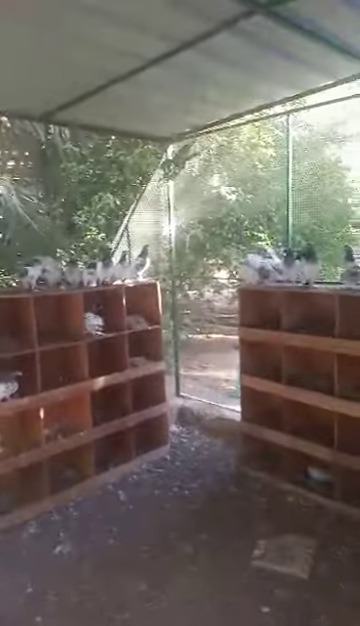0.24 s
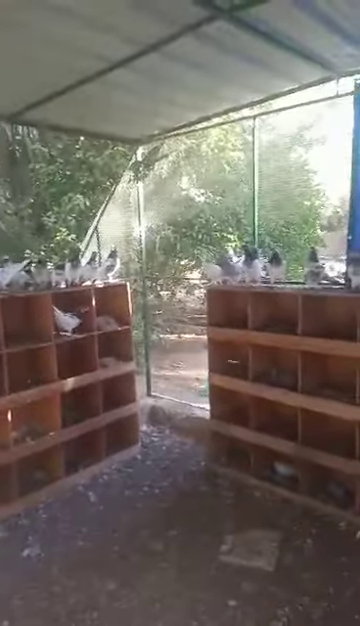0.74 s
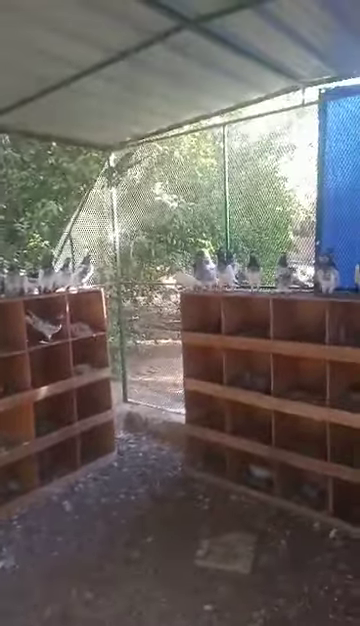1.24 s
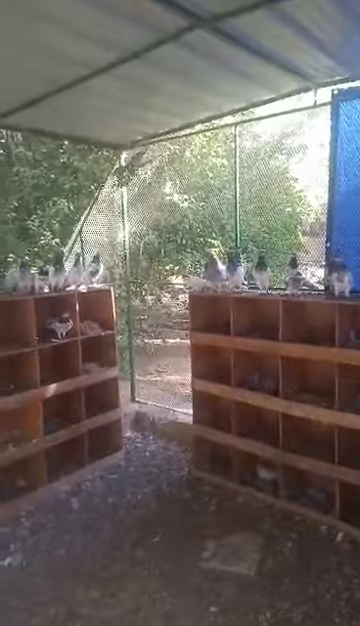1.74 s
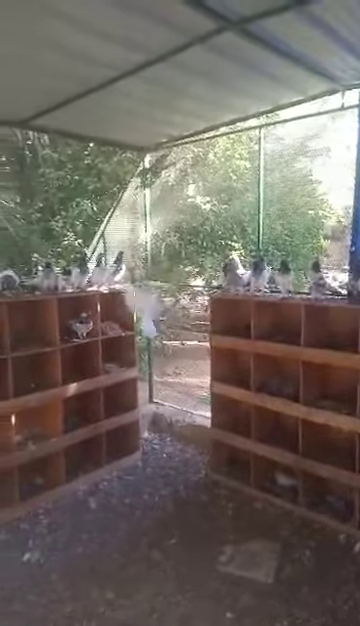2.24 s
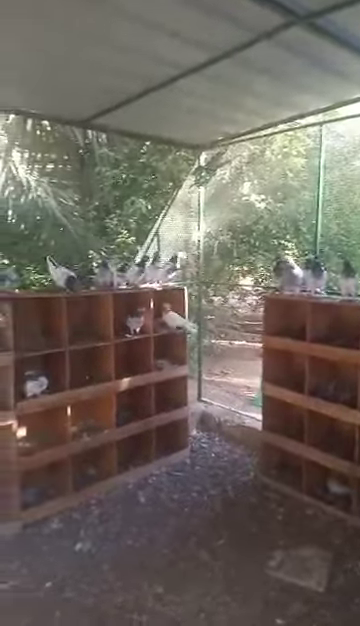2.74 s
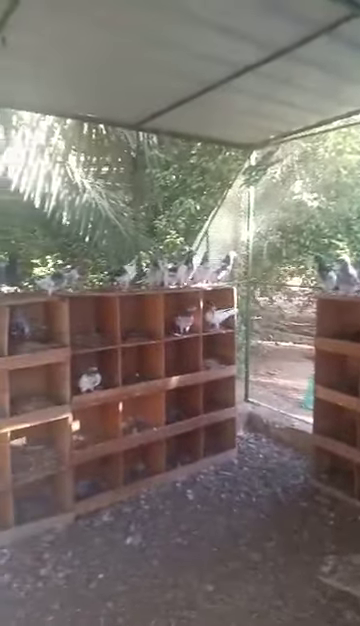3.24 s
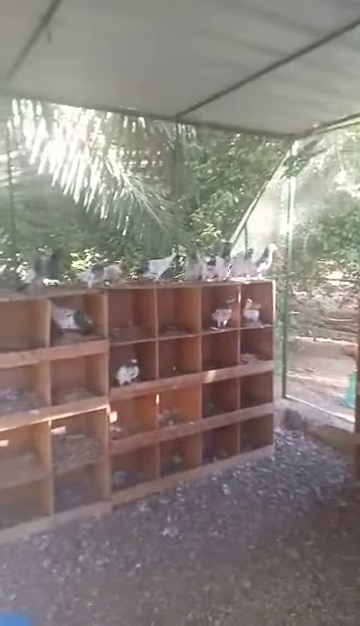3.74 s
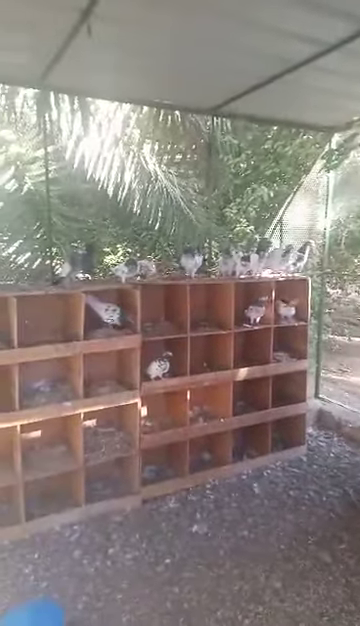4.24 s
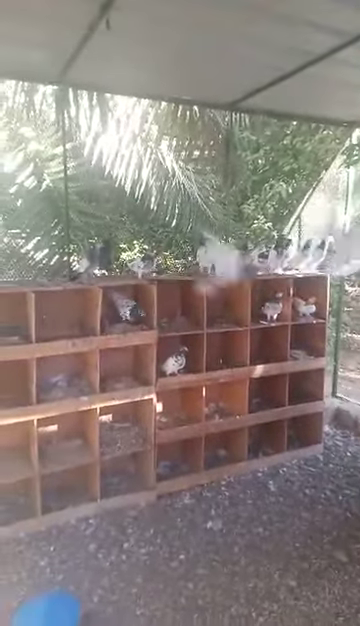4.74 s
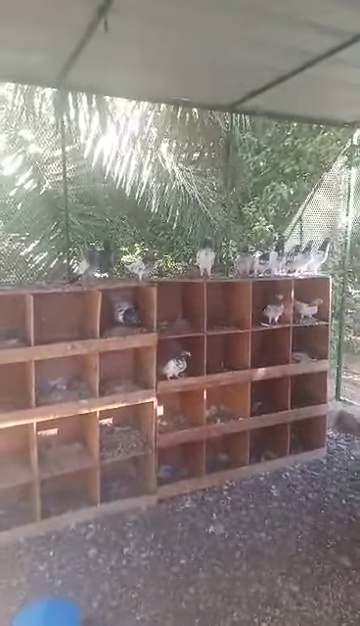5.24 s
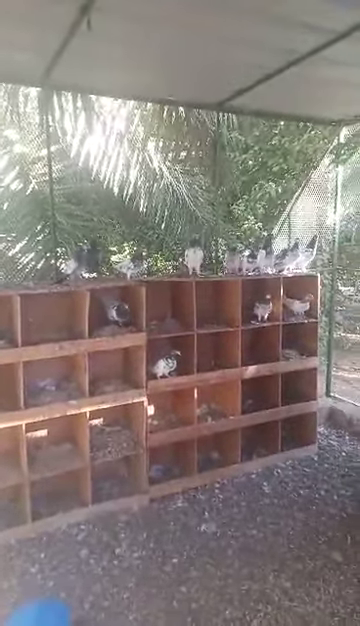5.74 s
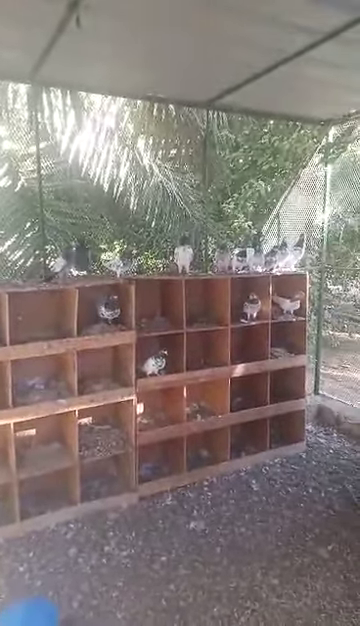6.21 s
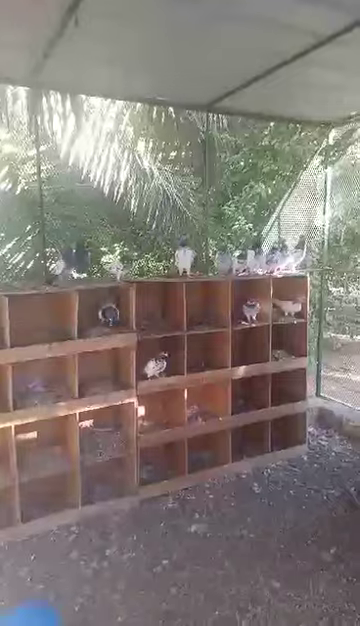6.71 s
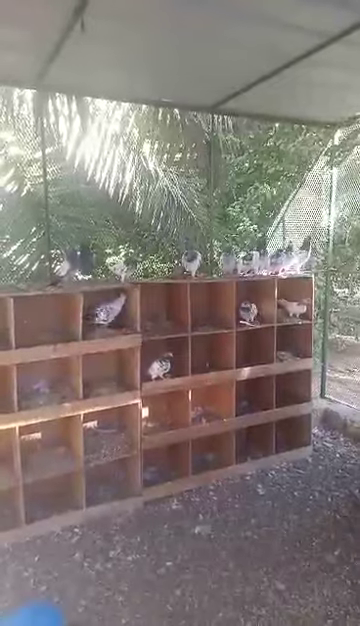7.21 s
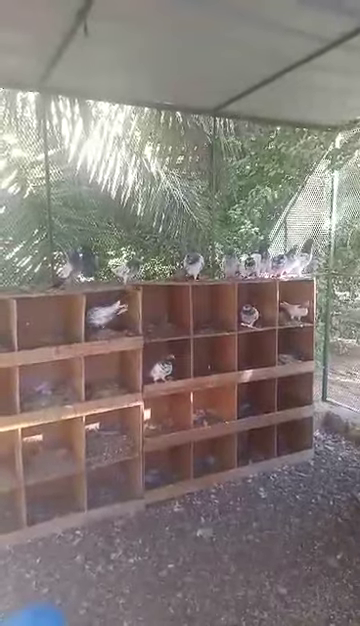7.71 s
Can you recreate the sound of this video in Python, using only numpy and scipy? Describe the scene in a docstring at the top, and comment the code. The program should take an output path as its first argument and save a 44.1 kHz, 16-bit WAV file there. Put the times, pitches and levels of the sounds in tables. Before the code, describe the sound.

In a roofed wire loft with wooden nest boxes, pigeons coo in short, low, gliding notes that swell, break and growl, among quick throaty pulses. A blurred flock murmurs behind. Wings clap and flutter past around two seconds and again near five. Squabs peep in thin falling whistles, wild birds screech raspily, and faint chirping and soft outdoor air continue. A phone microphone catches it with a short, boxy echo.

```python
"""Pigeons cooing in a wire loft

Pigeons coo in a roofed wire loft: gliding throat tones swell, break and dive, among short low pulses and held
tones, a few perhaps wing thuds; blurred, fluttering tones make the flock further back. Squabs peep in falling
whistles and wild birds squawk in raspy harmonic syllables, over faint sliding chirps and soft air noise.
Noise bursts clap as wings, swish as pigeons fly past and tick as claws. Boxes and roof give a short echo.
"""
import sys
import numpy as np
from scipy import signal
from scipy.fft import rfft, irfft, next_fast_len
from scipy.io import wavfile
from scipy.ndimage import uniform_filter1d, map_coordinates

SR = 44100
rng = np.random.default_rng(int(sys.argv[2]) if len(sys.argv) > 2 else 0)


def int16_out(signal):
    """Quantize to a 16-bit WAV file."""
    q = np.round(np.clip(np.atleast_2d(signal).T, -1, 1) * 32767)
    wavfile.write(sys.argv[1], SR, q.astype(np.int16))


N = 351477
TOP_HZ = 15500  # band limit

# Breathy growl of the pigeon's throat: (frequency [Hz], density [dB])
GROWL_SPECTRUM = [(80, -26.5), (180, -2.5), (400, 5.5), (560, -2.5), (800, -23.5), (1500, -43.5),
                  (5000, -110)]


def amp(db):
    """Decibels to gain."""
    return 10 ** (np.asarray(db) / 20)


def unit(x):
    """Scale to rms 1."""
    return x / np.sqrt(np.mean(x ** 2) + 1e-20)


def along(points, hz):
    """Read (Hz, value) points on a log frequency axis."""
    f, v = np.transpose(points)
    return np.interp(np.log(hz + 1), np.log(f + 1), v)


def curve(rows):
    """One value per sample from (s, value) rows."""
    return np.interp(np.arange(N) / SR, *np.transpose(rows))


def wobble(rate, size):
    """A smooth random curve through `rate` random knots a second."""
    knots = rng.standard_normal(int(size * rate / SR) + 4)
    return map_coordinates(knots, [np.arange(size) * rate / SR + 1])


def noise(spectrum, size):
    """Coloured noise of rms 1."""
    m = next_fast_len(size)
    white = rfft(rng.standard_normal(m))
    return unit(irfft(white * amp(along(spectrum, np.fft.rfftfreq(m, 1 / SR))), m)[:size])


def turns(hz):
    """Phase of an oscillator that follows a pitch curve."""
    return 2 * np.pi * np.cumsum(hz) / SR


def add(track, s, sound):
    """Mix a sound into a track at time s, or at the start if s is negative."""
    part = track[max(round(s * SR), 0):][:len(sound)]
    part += sound[:len(part)]


def throat(phase, second_db=-42, third_db=-49):
    """The swollen crop radiates little but the fundamental."""
    overtones = amp(second_db) * np.sin(2 * phase) + amp(third_db) * np.sin(3 * phase)
    return np.sqrt(2) * (np.sin(phase) + overtones)


def coo_voice(hz, db, roll, roll_hz=55, roll_db=5, bend=.1, waver=0.0056, growl_db=-8, tremor_db=2.0):
    """A gliding tone; where it rolls, an uneven flutter shakes loudness and pitch and breaks into a growl."""
    size = len(hz)
    flutter = np.sin(turns(roll_hz * (1 + 0.53 * wobble(40, size))))
    hz = hz * (1 + waver * wobble(60, size) + bend * roll * (flutter + wobble(220, size)))
    voice = throat(turns(hz)) + amp(growl_db) * roll ** 2 * noise(GROWL_SPECTRUM, size)
    level_db = db + tremor_db * wobble(79.3, size) + roll * (roll_db * flutter - 8.0)
    return amp(level_db) * voice


def coos(edge_s=0.0067, break_s=0.0045):
    """A coo settles onto its pitch as it swells; after a last, clear push the voice breaks, dives and growls out."""
    # Coos: (break [s], swell [s], start pitch [Hz], held pitch [Hz], settling time [s],
    #        relative level [dB], fullness [above 1 swells early], roll [0-1])
    coo_rows = [(.055, 0.064, 472, 349, 0.026, -29.5, 7.6, 1), (1.2, 0.053, 537, 482.5, 0.032, -21, 3, 0.2),
                (1.819, 0.055, 567, 492, 0.027, -28, 1.9, 0),
                (2.242, 0.037, 547, 396, 0.014, -22, 3.1, 0.4),
                (2.899, 0.054, 596, 447.5, 0.02, -24.5, 2.8, 0.42),
                (3.368, 0.18, 753.4, 489.5, 0.044, -17.5, 0.49, 0.3),
                (4.046, .135, 726, 441, .026, -23, 2.8, 0.14),
                (4.581, .14, 656, 487.4, 0.07, -16.5, 0.52, 0.45),
                (5.765, 0.14, 623, 464, 0.027, -20.5, 2.2, 0.05),
                (7.704, 0.16, 554, 417, 0.048, -19.5, 2.1, 0.15)]
    swell_db, push_db, push_s = 28, 2, 0.011  # rise of a coo; last push before the break and its width
    dive, dive_s, dive_lag_s = .39, 0.0087, .008  # share of the pitch lost at the break, how fast, how late
    fade_db_per_s, tail_s, tail_roll = 338.5, .06, 0.8  # the growl after the break
    out = np.zeros(N)
    for s, swell_s, start_hz, held_hz, settle_s, db, fullness, roll in coo_rows:
        t = np.arange(-swell_s, tail_s, 1 / SR)  # the voice breaks at t = 0
        push = np.exp(-(t / push_s + .5) ** 2)
        settled = held_hz + (start_hz - held_hz) * np.exp(-(t + swell_s) / settle_s)
        hz = settled * (1 - dive / (1 + np.exp((dive_lag_s - t) / dive_s)))
        effort = db - swell_db * np.maximum(-t / swell_s, 0) ** fullness
        effort = effort + push_db * push - fade_db_per_s * np.maximum(t, 0)
        rolling = np.interp(t, [0, break_s], [roll, tail_roll]) * (1 - push)
        edges = np.clip(np.minimum(t + swell_s, tail_s - t) / edge_s, 0, 1)
        add(out, s - swell_s, edges * coo_voice(hz, effort, rolling))
    return out


def wings(beat_hz=15, beat_db=6, uneven_db=2.0, crackle_db=2.5, gain_db=-1):
    """Feathers snap and swish with every stroke, finely crackling, loudest where the bird is nearest."""
    # Flights past the listener: (start [s], nearest [s], end [s], relative level [dB])
    flights = [(0, 0.03, 0.17, -48.5), (.7, 2.098, 2.35, -39), (4.621, 4.993, 5.55, -36)]
    # Swish of the feathers: (frequency [Hz], density [dB])
    feathers = [(30, -21.5), (70, 14.5), (130, 4), (300, 14), (780, 7), (1400, 3.5), (2500, 2),
                (4200, -8.5), (5300, -29), (8000, -34.5), (10000, -48), (15500, -37)]
    pass_s = 0.14  # distance of the nearest approach over the speed of flight
    out = np.zeros(N)
    for start, nearest, end, db in flights:
        t = np.arange(start, end, 1 / SR)
        beat = turns(beat_hz * (1 + 0.21 * wobble(8, len(t))))
        stroke = signal.sawtooth(beat, .1)  # quick rise, slow fall
        flutter_db = beat_db * stroke + uneven_db * wobble(34.43, len(t)) + crackle_db * wobble(320, len(t))
        swish = unit(noise(feathers, len(t)) * amp(flutter_db))
        distance = np.hypot(1, (t - nearest) / pass_s)
        add(out, start, amp(db + gain_db) / distance * swish * signal.windows.tukey(len(t), .1))
    return out


def flock(tone_db=-5, blur_db=-3, count=220):
    """Distant coos overlap: many short, fluttering tones over their own blurred echo, drawn as noise."""
    # Loudness of the pigeons further back: (time [s], relative level [dB])
    flock_level = [(0.0, -48), (0.84, -36.5), (2.5, -38.5), (4.4, -47.5), (5.04, -33.5), (6.5, -61),
                   (7.59, -51.5), (7.97, -65.5)]
    # Blurred far coos: (frequency [Hz], density [dB])
    far_coos = [(60, -26.5), (150, -5.5), (280, -0.5), (430, 0.5), (580, -7.5), (760, -7), (1200, -20.5),
                (5000, -110)]
    tones = np.zeros(N)
    for place, length, pitch in rng.random((count, 3)):
        u = np.linspace(0, 1, int((.04 + .08 * length) * SR))
        bend = .12 * (np.sin(np.pi * u) - u) + .08 * wobble(170, len(u))
        hz = (270 + 420 * pitch ** 2) * (1 + bend)
        swell = np.sin(np.pi * u) * amp(6.1 * wobble(96.0, len(u)))
        add(tones, place * N / SR, swell * throat(turns(hz)))
    blur = unit(noise(far_coos, N) * amp(5.46 * wobble(35, N)))
    return amp(curve(flock_level)) * (amp(tone_db) * unit(tones) + amp(blur_db) * blur)


def chatter(tone_db=-6, blur_db=-2, count=420):
    """Many faint, sliding chirps from the trees merge with their own echoes, drawn as wavering noise."""
    # Loudness of the birds far off in the trees: (time [s], relative level [dB])
    chatter_level = [(0, -47.5), (1.7, -49.5), (2.8, -48.5), (3.7, -46), (4.1, -53.5), (4.8, -43.5),
                     (5.5, -50), (6.8, -52.5), (7.25, -64), (7.97, -57.5)]
    chirps = np.zeros(N)
    for place, length, pitch, slide in rng.random((count, 4)):
        u = np.linspace(0, 1, int((.02 + 0.027 * length) * SR))
        hz = (2200 + 1600 * pitch) * (1 + .3 * (slide - .5) * u + .035 * wobble(700, len(u)))
        add(chirps, place * N / SR, np.sin(np.pi * u) * np.sin(turns(hz)))
    blur = noise([(1000, -5.0), (2000, -5.5), (3100, 1.0), (4200, -8.5),
                  (5200, -24.0), (8000, -33.0), (11000, -50.5)], N)
    blur = unit(blur * amp(4.3 * wobble(14, N)))
    return amp(curve(chatter_level)) * (amp(tone_db) * unit(chirps) + amp(blur_db) * blur)


def outdoor_air(level_db=-53):
    """The outdoor air is steady coloured noise whose level flickers slightly."""
    # Air bed: (frequency [Hz], density [dB])
    air_spectrum = [(25, -26), (50, 2.5), (90, 11.5), (250, 4.5), (650, -8.5), (1100, -9), (1600, -4),
                    (3100, -1), (4200, -16.5), (5200, -38.5), (8000, -50), (10000, -42.5)]
    return amp(level_db + wobble(21.0, N)) * noise(air_spectrum, N)


def claws(level_db=-54, spread_db=4, t60=.055, attack_s=0.0013, count=120):
    """Claws and beaks tick and scrape on wood and grit: short noise bursts at random times."""
    # Scrape on grit: (frequency [Hz], density [dB])
    grit = [(400, -18), (1500, -4.5), (3500, 1), (4500, 4.5), (5500, -11.5), (8000, -11.5), (9500, -33),
            (15500, -38.5)]
    out, t = np.zeros(N), np.arange(SR // 20) / SR
    for place, size in rng.random((count, 2)):
        decay_db = level_db + spread_db * (2 * size - 1.5) - 60 * t / t60
        envelope = amp(decay_db) * (1 - np.exp(-t / attack_s))
        add(out, place * N / SR, envelope * noise(grit, len(t)))
    return out


def claps(t60=0.035, thump_t60=0.12, snap_db=0, thump_db=-9, attack_s=0.00062):
    """Wing tips slap together and push out a low puff of air."""
    # Wing claps and landings: (time [s], relative level [dB], puff level above thump_db [dB])
    clap_rows = [(0.068, -37, 2), (0.7429, -32.5, 2), (0.79, -49, 3), (0.8277, -31.5, 3.5),
                 (1.4125, -31, -25), (1.8115, -33.5, 4), (2.1098, -30.5, 5), (2.2606, -15.5, -6),
                 (2.3443, -30.5, 0), (2.5, -36.5, -7), (2.7725, -40.5, -26), (4.685, -22.5, 2),
                 (5.026, -24, -23), (4.941, -30, 12), (5.1, -45, 16.5), (5.28, -41.5, 14), (5.1421, -37, 9),
                 (5.3937, -30.5, -13), (5.458, -36, 2), (5.5088, -28.5, -18), (5.7681, -28.5, 0),
                 (6.163, -36, 5.5)]
    # Slap of the wing tips: (frequency [Hz], density [dB])
    snap_spectrum = [(200, -5.5), (900, 9), (1600, 4), (2700, 10.5), (4200, 4), (5300, -16.5),
                     (8000, -19.5), (10000, -37.5), (15500, -38)]
    puff_spectrum = [(30, -26.5), (100, 2.5), (700, 0.5), (2000, -35.0), (5000, -62.0)]  # (Hz, dB)
    out, t = np.zeros(N), np.arange(SR // 6) / SR
    for s, db, low_db in clap_rows:
        snap = noise(snap_spectrum, len(t)) * amp(snap_db - 60 * t / t60)
        snap = snap * (1 - np.exp(-t / attack_s))
        puff = noise(puff_spectrum, len(t)) * amp(low_db + thump_db - 60 * t / thump_t60)
        puff = puff * (1 - np.exp(-t / 0.0059))
        add(out, s, amp(db) * (snap + puff))
    return out


def squawks(jitter=0.055, waver=0.0084, rasp_hz=700, rasp_db=5, slope_db=-1, gain_db=-1, count=6):
    """Harmonic syllables scoop up to pitch, hold and flick away; rasp scatters the cycles into a screech."""
    # Wild birds' syllables: (time [s], length [s], pitch [Hz], closing flick [share of the pitch],
    #                         level before gain_db [dB], rasp [0-1])
    syllables = [(0.081, .1, 3280, -0.1, -43, 0.06), (0.093, 0.115, 2220, -0.17, -56.5, 0.7),
                 (0.153, 0.068, 4680, -0.14, -44, 0.8), (0.258, 0.12, 2184, -0.069, -42, 1),
                 (0.876, .04, 3180, -.22, -41.5, 0), (0.879, 0.056, 3630, .08, -44, 0.2),
                 (1.104, 0.095, 2195, -0.091, -40, 1), (1.132, 0.079, 5520, 0.27, -55, 1),
                 (1.455, 0.03, 3480, -.22, -42, 0.3), (1.493, 0.061, 4020, 0.073, -46, .15),
                 (1.556, 0.097, 2850, -0.25, -38, 0.8), (1.595, 0.096, 3540, .08, -42, 0.4),
                 (1.689, 0.077, 2130, 0.056, -35.5, 0.47), (1.69, 0.12, 5590, 0.17, -50.5, 1),
                 (3.042, .08, 3936, 0.2, -44.5, 0.5), (3.072, 0.06, 6400, 0.21, -66, 0.2),
                 (3.214, 0.055, 2445, 0.19, -39.5, 1), (3.27, .06, 2120, -.05, -41.5, 0.6),
                 (3.316, 0.046, 3900, -0.14, -36.5, 0.9), (3.346, 0.019, 2940, -0.35, -29, 0.5),
                 (3.384, 0.049, 4057, 0.43, -32.5, 0.13), (3.394, 0.049, 3184, 0.41, -40.5, 0.7),
                 (3.441, 0.011, 4050, -.12, -36.5, .3), (3.513, .03, 4750, 0.56, -40, .6),
                 (3.542, 0.039, 2986, -0.011, -31.5, 0), (3.572, .007, 3610, 0.6, -32.5, 1),
                 (3.591, 0.05, 3930, 0.6, -32, 0), (3.823, 0.022, 3776, -0.18, -39.5, .1),
                 (3.589, 0.053, 3155, 0.26, -40.5, 0.8), (4.437, 0.067, 2217, -0.017, -45.5, 0.45),
                 (4.48, 0.053, 5330, -.05, -54, 0.8), (4.668, 0.086, 3990, -0.075, -38.5, 0.2),
                 (4.724, 0.087, 2666, -0.094, -39.5, 1), (5.578, 0.069, 2150, -0.022, -41, 0.6),
                 (5.61, 0.11, 5880, .03, -55, 0.6), (6.259, 0.11, 2145, 0.1, -44, 0.4),
                 (6.326, 0.063, 5540, .06, -50, 1), (6.402, 0.055, 2122, -0.32, -38, .08),
                 (6.448, 0.065, 1950, 0.43, -38, 0.6), (6.73, .063, 2104, .05, -35, 0.17),
                 (6.782, 0.037, 5050, 0.37, -47, 0.6), (6.814, 0.049, 2027, -0.27, -42, .3),
                 (6.932, 0.067, 3264, 0.19, -35.5, 0.11), (6.957, 0.044, 3575, .1, -28, 0),
                 (7.032, .07, 4106, 0.19, -35.5, 0.1), (7.303, .08, 3537, -.1, -43.5, 0.48),
                 (7.375, 0.095, 3024, -0.11, -39, 0.88), (7.509, 0.047, 3680, -0.76, -40.5, 0.8),
                 (7.57, .041, 3460, 0.088, -39, 0.7)]
    # How the overtones carry: (frequency [Hz], level [dB])
    beak = [(900, -26), (1800, 7), (2800, 21), (4300, 13), (5100, 0), (6400, -6.5), (7200, -23.5),
            (8600, -24), (10000, -37), (13000, -32), (15500, -39)]
    scoop, scoop_share = .04, .15  # a syllable starts this far flat, for about this share of its length
    flick_power = 4  # lateness of the flick
    out = np.zeros(N)
    for s, length, hz, flick, db, rasp in syllables:
        u = np.linspace(0, 1, int(length * SR))
        arc = hz * (1 - scoop * np.exp(-u / scoop_share) + flick * u ** flick_power)
        shake = jitter * rasp * wobble(rasp_hz, len(u)) + waver * wobble(260, len(u))
        phase = turns(arc * (1 + shake))
        voice = np.zeros(len(u))
        for k in range(1, count + 1):
            carried = amp(along(beak, k * arc) + slope_db * (k - 1)) * (k * arc < TOP_HZ)
            voice += carried * np.sin(k * phase)
        voice = unit(voice) + .5 * rasp * noise(beak, len(u))
        rattle_db = rasp_db * rasp * wobble(250, len(u)) + 3.56 * wobble(90.5, len(u))
        voice = unit(voice * amp(rattle_db))
        add(out, s, amp(db + gain_db) * np.abs(np.sin(np.pi * u)) ** .5 * voice)
    return out


def peeps(crest=.25, lift=.17, knee=.68, droop=.16):
    """Thin begging whistles: a quick rise, a nearly level top, then a louder, steep fall."""
    # Squab peeps: (time [s], length [s], top pitch [Hz], relative level [dB])
    peep_rows = [(0.185, .075, 2595, -38), (0.467, 0.26, 3500, -43), (1.216, 0.16, 2995, -42.5),
                 (1.247, 0.13, 3380, -52.5), (2.493, 0.2, 3016, -46.5), (2.893, 0.14, 2940, -42),
                 (3.788, 0.12, 3484, -41), (4.2, 0.12, 2980, -41), (4.246, 0.078, 3370, -46.5),
                 (4.428, 0.17, 3270, -46), (4.802, 0.13, 3265, -39.5), (5.183, 0.11, 3010, -38.5),
                 (5.674, 0.17, 3416, -43), (5.9, .155, 2987, -40.5), (5.971, .24, 3890, -41),
                 (6.404, 0.076, 2804, -36), (6.531, 0.26, 3800, -41), (6.643, 0.12, 3300, -38.5),
                 (7.693, 0.23, 3650, -45.5), (7.867, 0.13, 3180, -46.5)]
    end_hz = 2220  # every peep falls to this pitch
    out = np.zeros(N)
    for s, length, top_hz, db in peep_rows:
        u = np.linspace(0, 1, int(length * SR))
        corners = [top_hz * (1 - lift), top_hz, top_hz - droop * (top_hz - end_hz), end_hz]
        path = np.interp(u, [0, crest, knee, 1], corners)
        rounded = uniform_filter1d(path, size=len(u) // 6, mode="nearest")
        hz = rounded * (1 + 0.009 * wobble(550, len(u)))
        swell = np.interp(u, [0, crest, .85, .96, 1], [.1, .42, 1.35, .8, 0])
        swell = swell * amp(db + 2.5 * wobble(110, len(u)))
        add(out, s, swell * np.sin(turns(hz)))
    return out


def pulses(rise=0.0082, sag=0.074, gain_db=-3, growl_db=-14):
    """Each short low pulse swells within a few cycles and sags in pitch as it fades."""
    # Short low pulses, some perhaps wing thuds: (start [s], level before gain_db [dB], pitch [Hz])
    pulse_rows = [(0.477, -24, 432), (0.526, -23.5, 430), (0.579, -26.5, 428), (0.659, -33, 323),
                  (0.71, -25, 330), (0.753, -29.5, 416), (0.787, -29, 340), (0.868, -22, 483),
                  (0.919, -31.5, 366), (0.951, -33, 445), (1.502, -32.5, 455), (1.562, -18.5, 447),
                  (1.621, -19, 444), (2.351, -34.5, 231), (2.574, -29.5, 423), (2.63, -21, 445),
                  (2.661, -24.5, 400), (2.696, -21.5, 436), (2.828, -28, 314), (3.621, -31.5, 441),
                  (3.678, -28.5, 464), (3.733, -19.5, 433), (3.802, -18.5, 442), (4.24, -19, 453),
                  (4.934, -22, 288), (5.166, -28.5, 482), (5.358, -19.5, 452), (5.456, -25, 487),
                  (5.843, -27.5, 190), (7.044, -34, 460), (7.047, -35, 226), (7.185, -38, 307),
                  (7.24, -27.5, 329), (7.321, -26.5, 446), (7.464, -19.5, 399)]
    out, t = np.zeros(N), np.arange(SR // 10) / SR
    for s, db, hz in pulse_rows:
        u = t / rise  # loudest at u = 1
        pitch = hz * (1 + sag * (np.exp(1 - u) - 1) / 2 + 0.011 * wobble(88, len(t)))
        voice = throat(turns(pitch)) + amp(growl_db) * noise(GROWL_SPECTRUM, len(t))
        add(out, s, amp(db + gain_db) * (u * np.exp(1 - u)) ** 2 * voice)
    return out


def held_tones(sag=0.044):
    """Short held tones from the coo's oscillator: attack, hold and release on a slightly sagging pitch."""
    # Short held tones, mostly coo notes, a few perhaps wing thuds:
    # (time [s], length [s], pitch [Hz], relative level [dB], roll [0-1])
    tone_rows = [(0.933, 0.087, 691, -39.5, 0.53), (1.05, 0.058, 560, -36, .1),
                 (1.088, 0.083, 479, -22.5, 0), (1.85, 0.069, 381.5, -20, 1),
                 (1.854, 0.056, 207, -23.5, 0.9), (1.911, .06, 424.5, -22.5, 0.22),
                 (2.954, 0.048, 423.5, -21.5, 0.2), (2.996, 0.038, 403.3, -27, 0.33),
                 (3.042, 0.056, 418, -28.5, 1), (4.067, 0.046, 429, -20, 0.23),
                 (4.116, 0.068, 423, -21, 0.71), (4.465, 0.068, 612, -44, 0.27),
                 (4.928, 0.06, 682, -31, 0.33), (5.155, 0.027, 840, -29, 0.3),
                 (7.09, 0.053, 705, -44, 0.74)]
    attack_s, release_s = 0.0085, 0.022
    out = np.zeros(N)
    for s, length, hz, db, roll in tone_rows:
        t = np.arange(0, length, 1 / SR)
        gate = np.clip(np.minimum(t / attack_s, (length - t) / release_s), 0, 1)
        add(out, s, gate * coo_voice(hz * (1 - sag * (t / length - .5)), db, roll))
    return out


def loft(x, wet_db, stretch):
    """Short diffuse echo of boxes and roof, made of overlapping random tails."""
    # Echo decay: (frequency [Hz], t60 before stretch [s])
    decay = [(150, 0.34), (450, 0.26), (1500, 0.19), (4000, 0.2), (12000, 0.05)]
    out, hop = np.zeros(N), SR // 4
    for start in range(0, N, hop):  # overlapping half-second pieces, each with a fresh tail
        hz, t, z = signal.stft(rng.standard_normal(SR // 2), SR, nperseg=256)
        t60 = stretch * along(decay, hz)[:, None]
        tail = signal.istft(z * amp(-60 * t / t60), SR, nperseg=256)[1]
        part = x[start:start + 2 * hop]
        part = part * np.sin(np.pi * np.arange(len(part)) / (2 * hop))
        add(out, start / SR + .006, signal.fftconvolve(part, tail / np.linalg.norm(tail)))
    return x + amp(wet_db) * out


def scene():
    """Birds in and around the loft over the outdoor air."""
    near = amp(1) * loft(coos() + held_tones() + pulses(), wet_db=-9.0, stretch=0.54)
    young = loft(peeps(), wet_db=-6.0, stretch=0.84)
    wild = loft(squawks(), wet_db=-5.5, stretch=1.87)
    flight = loft(claps() + claws(), wet_db=-6.5, stretch=0.43) + wings()
    return (near + young + wild + flight + flock() + chatter() + outdoor_air())[None]


def record(dry, low_hz=48, knee_db=-25, squeeze=0.33):
    """The phone turns everything down under a loud coo, sheds the deepest bass and stops at its band limit."""
    level = np.sqrt(np.abs(uniform_filter1d(dry ** 2, size=SR // 25)))
    held = dry * np.hypot(1, level / amp(knee_db)) ** -squeeze
    m = next_fast_len(N + SR // 2)
    hz = np.fft.rfftfreq(m, 1 / SR)
    response = hz ** 2 / np.hypot(hz ** 2, low_hz ** 2) * (hz < TOP_HZ)
    return irfft(rfft(held, m) * response, m)[..., :N]


dry = scene()
out = record(dry)
int16_out(out)
```